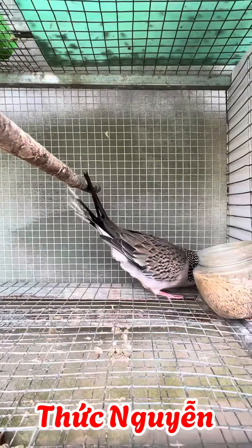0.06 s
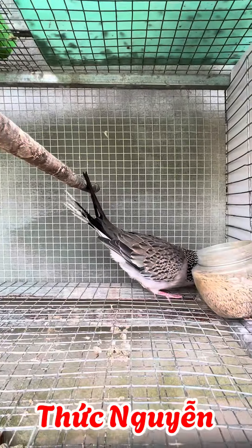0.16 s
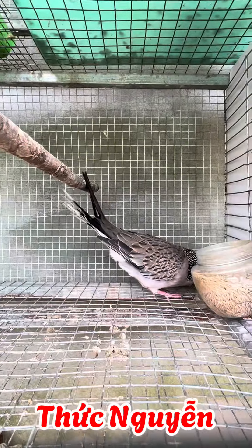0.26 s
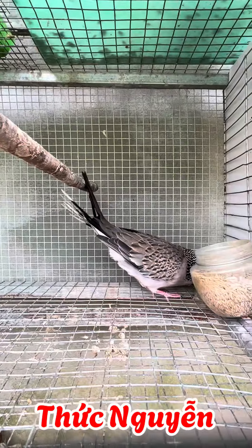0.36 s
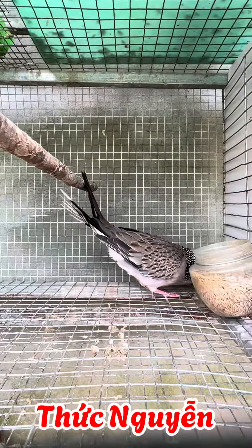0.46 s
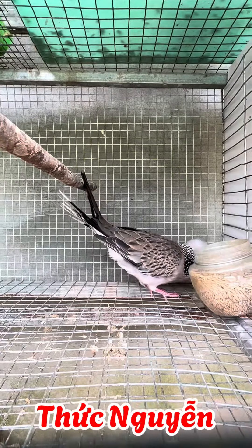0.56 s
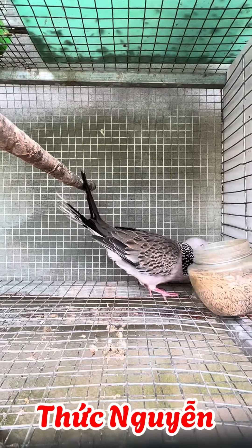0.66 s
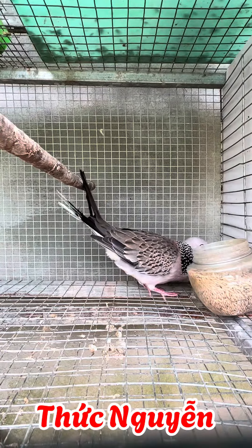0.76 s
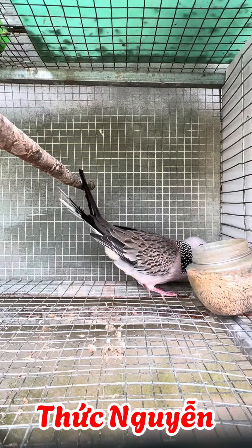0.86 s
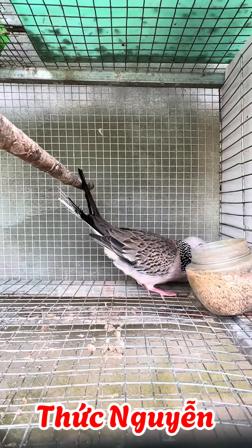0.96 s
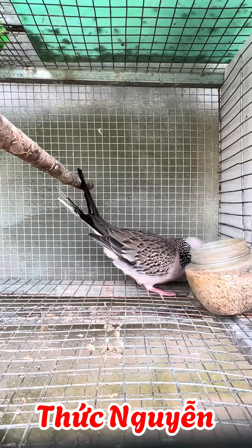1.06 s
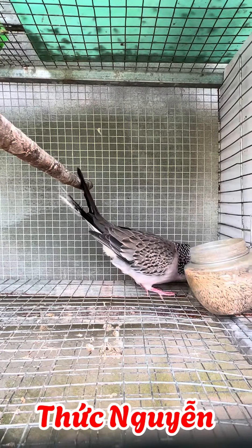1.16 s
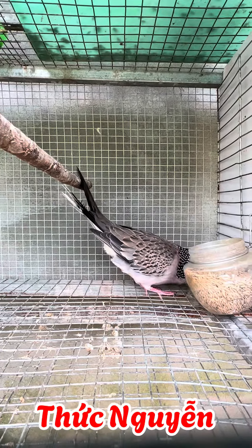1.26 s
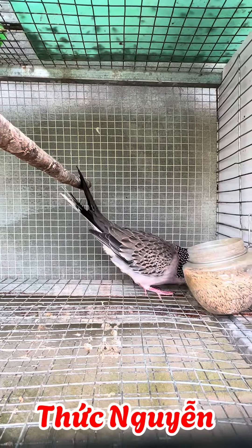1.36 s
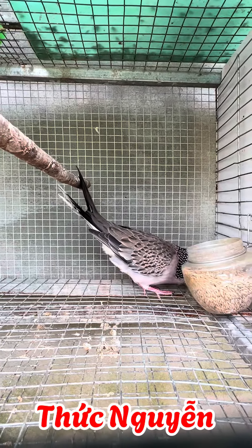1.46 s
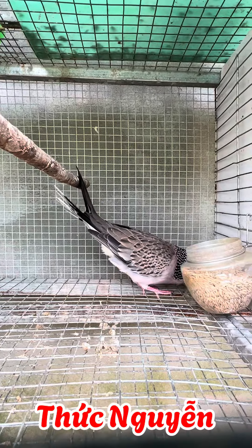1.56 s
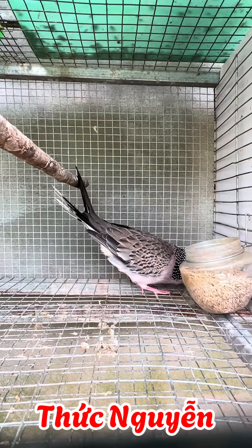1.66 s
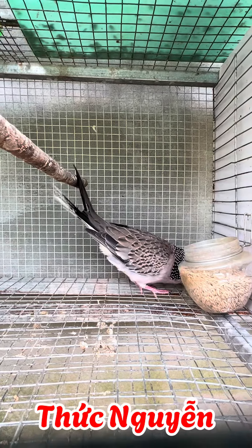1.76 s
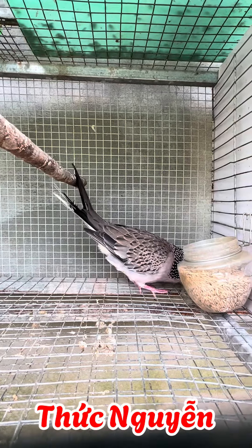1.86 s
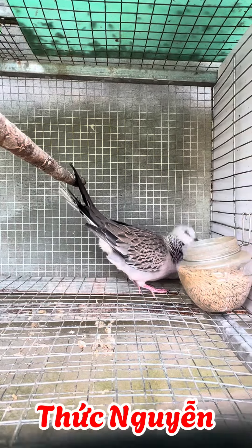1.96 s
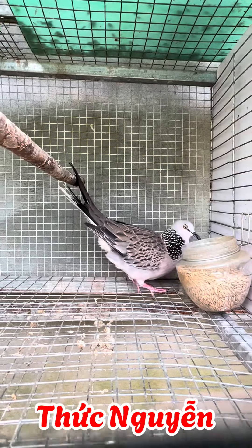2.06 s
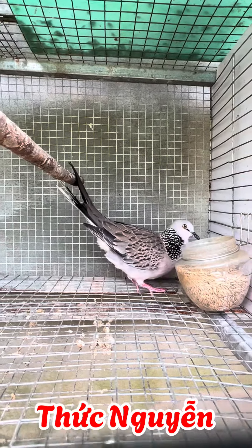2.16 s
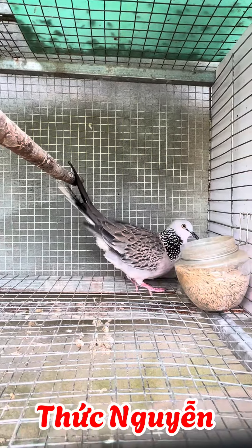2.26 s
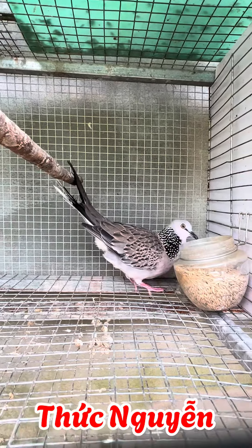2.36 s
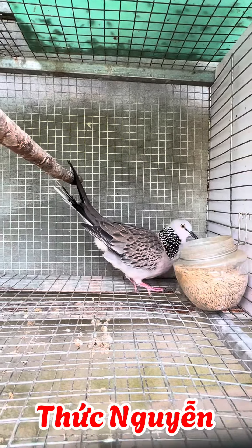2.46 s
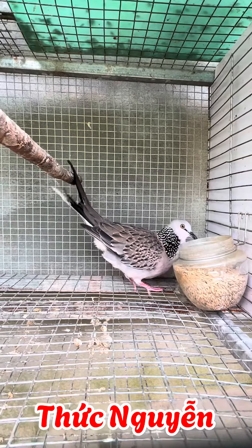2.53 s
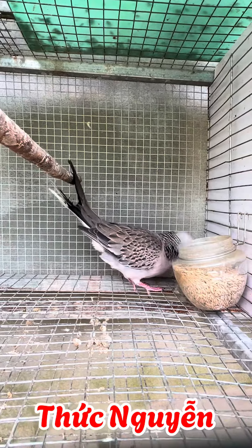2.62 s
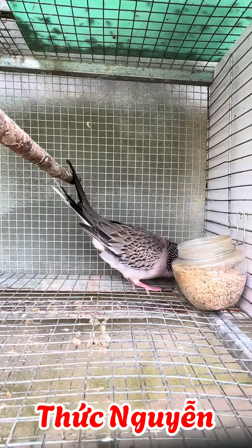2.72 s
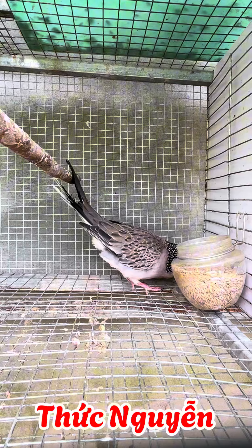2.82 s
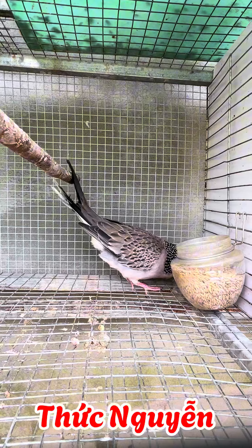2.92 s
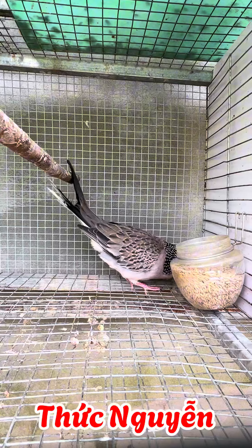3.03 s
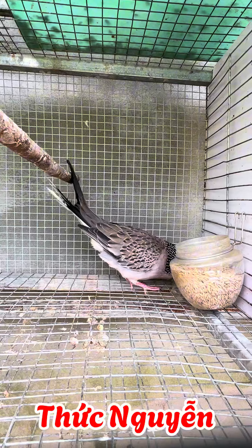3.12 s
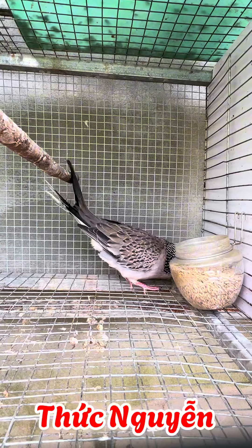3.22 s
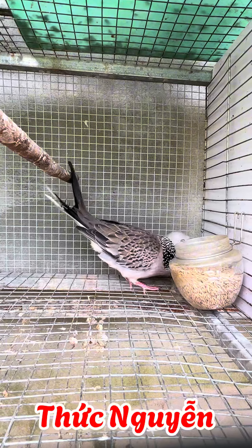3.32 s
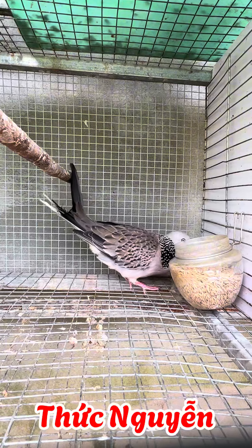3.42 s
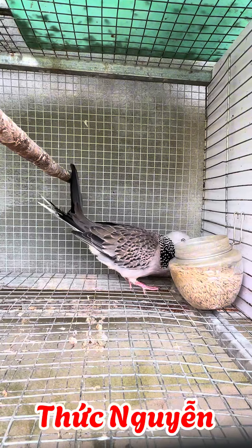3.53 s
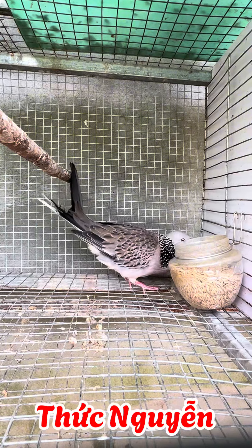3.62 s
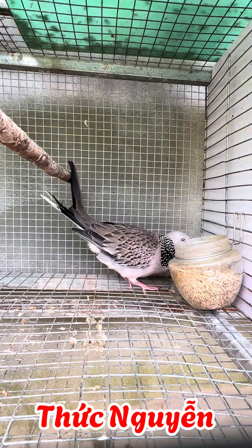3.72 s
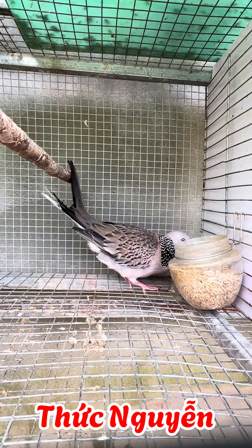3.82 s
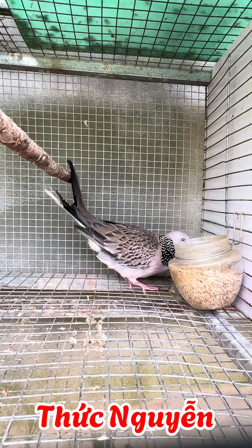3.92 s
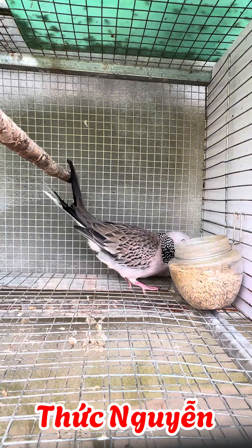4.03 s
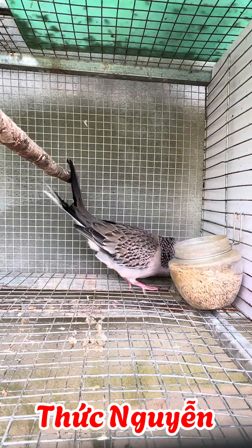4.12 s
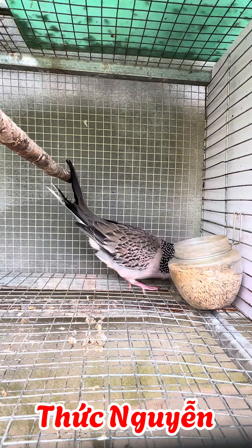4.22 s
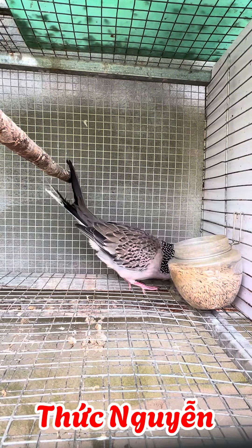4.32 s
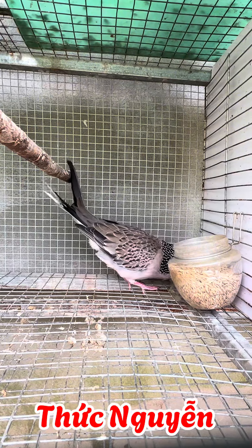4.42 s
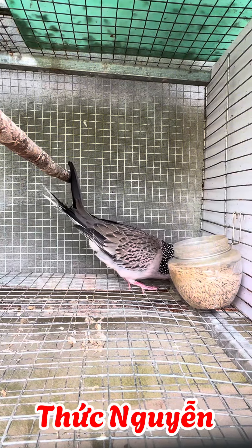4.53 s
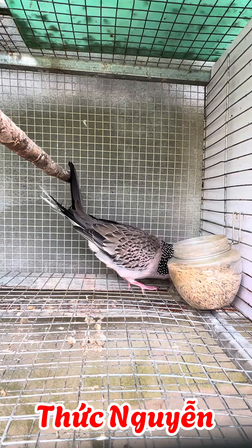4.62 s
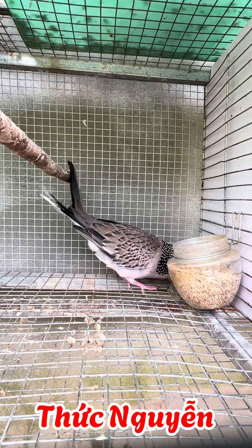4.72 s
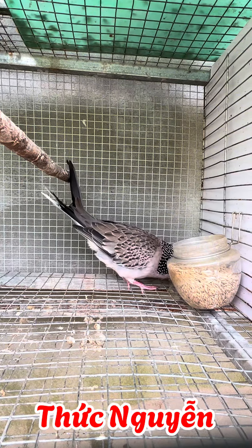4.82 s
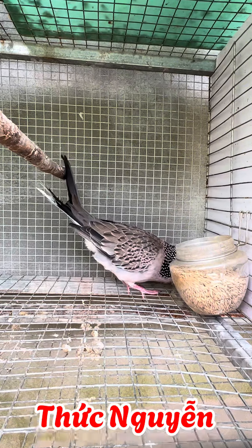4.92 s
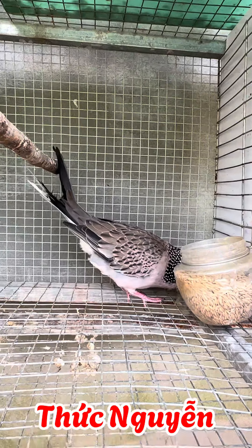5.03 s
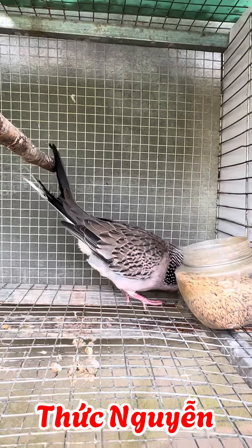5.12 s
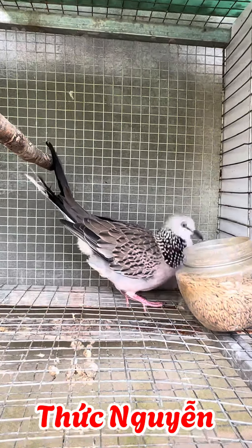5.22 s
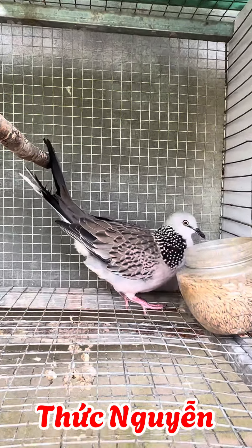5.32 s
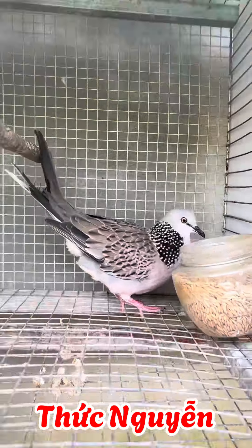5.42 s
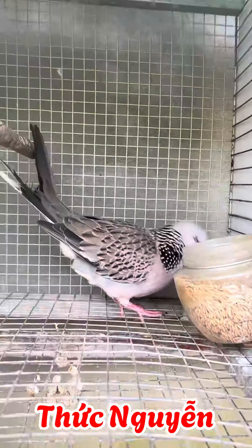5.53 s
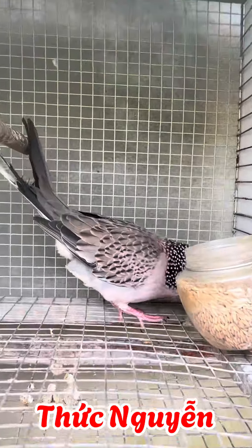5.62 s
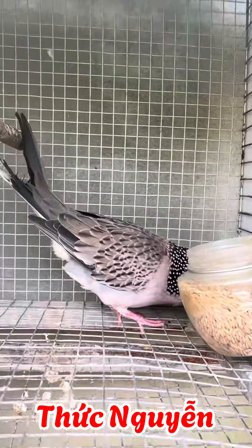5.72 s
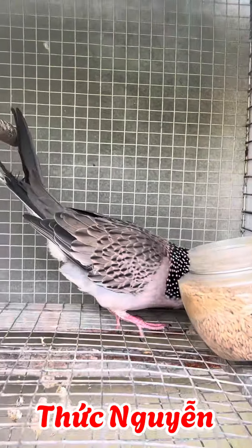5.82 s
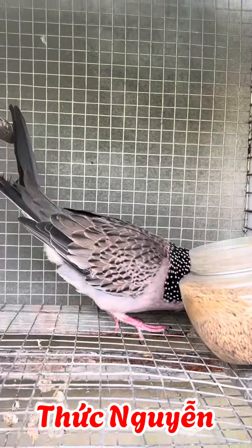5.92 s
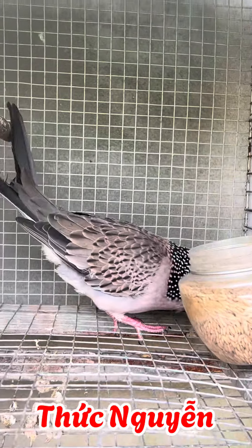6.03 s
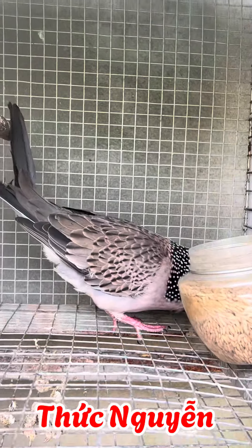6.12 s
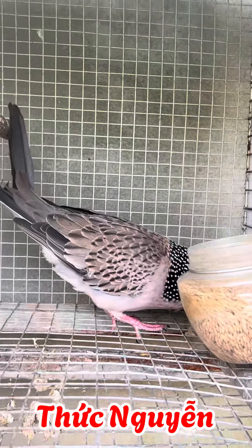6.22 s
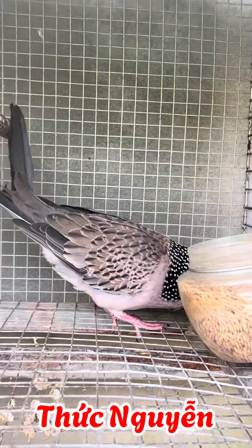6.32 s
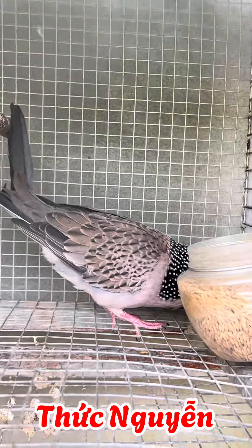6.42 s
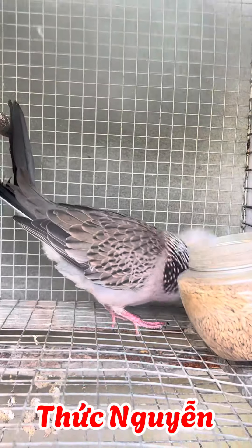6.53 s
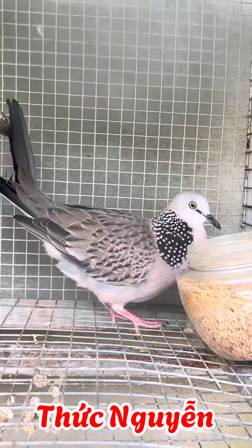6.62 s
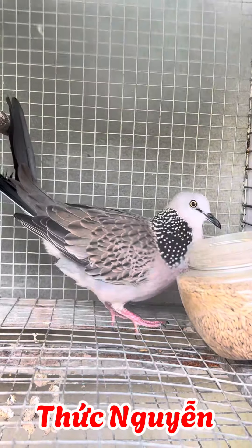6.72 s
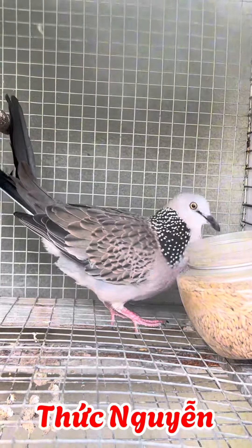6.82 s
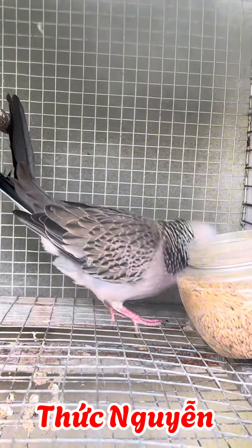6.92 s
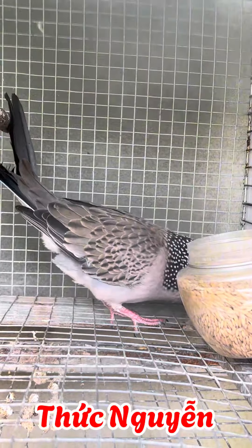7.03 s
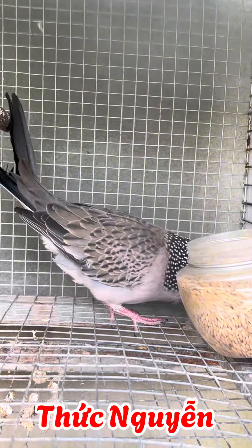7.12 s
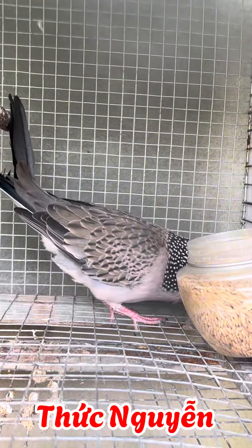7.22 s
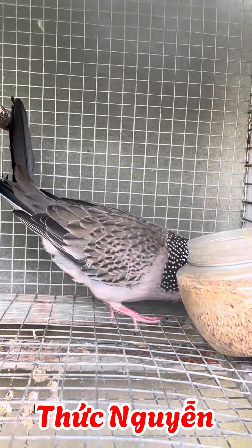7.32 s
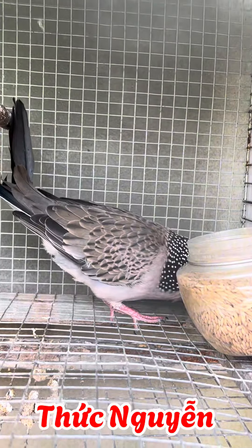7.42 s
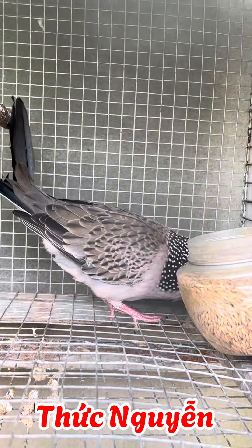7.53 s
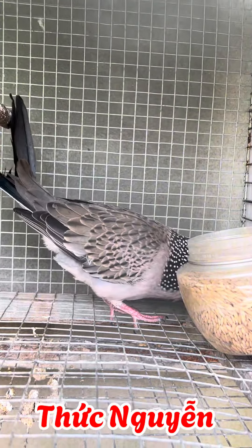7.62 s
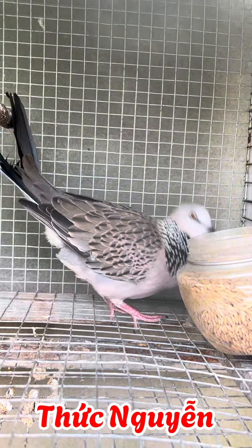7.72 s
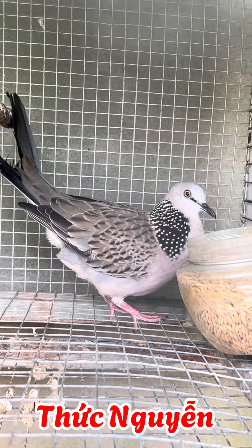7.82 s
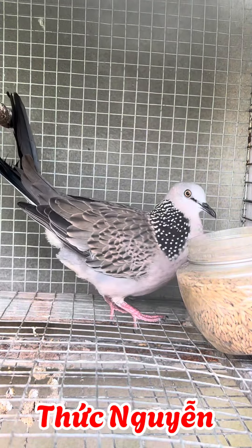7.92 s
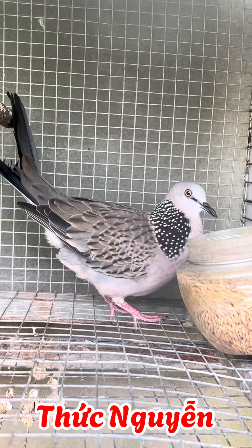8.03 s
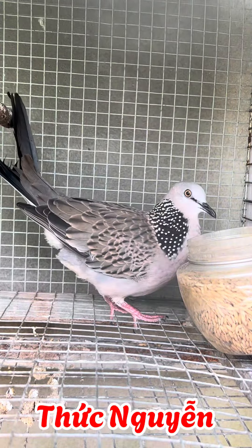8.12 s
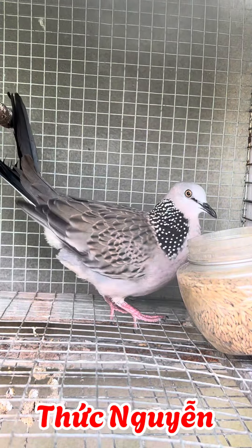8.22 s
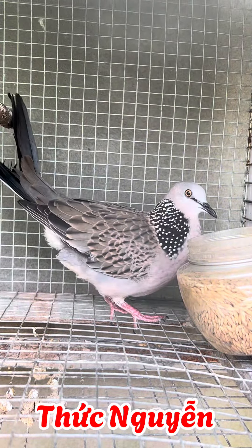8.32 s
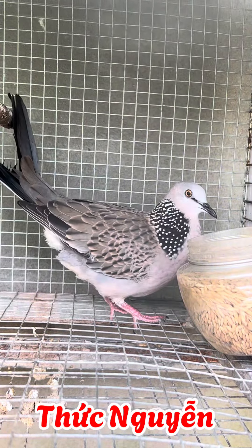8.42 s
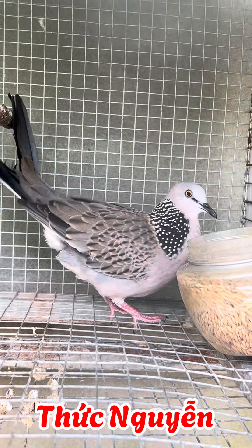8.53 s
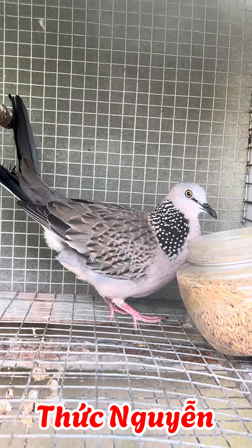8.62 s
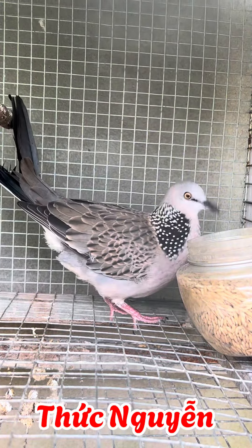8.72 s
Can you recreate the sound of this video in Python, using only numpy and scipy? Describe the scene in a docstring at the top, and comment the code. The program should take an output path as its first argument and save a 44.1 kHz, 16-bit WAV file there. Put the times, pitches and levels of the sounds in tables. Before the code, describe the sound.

A clear, hollow dove coo is already sounding at 0 s, and a long rolling coo follows at 0.2, fading into a faint hum, amid dry rustling and ticks on a wire cage. The close dove gives five more phrases. At 1.1 a short rising note breaks raspily, then a roll at 1.4; a fuller phrase from 2.6 has a short opener, a swelling clear note and a long trill at 3.1. Another short phrase starts at 4.05, a full one at 5.5, and a last at 6.9, rolling until about 7.5. A sharp tick lands near 1.7, scratches cluster around 3.4-3.6, and grazed mesh rings near 6.3. Softer distant doves glide near 2 and from 4.9 to 8.3; tiny high peeps pass between 3.2 and 4.9. Quiet yard air and low rumble continue, with a final tick at 8.4. Near phone microphone, slight enclosed echo.

```python
"""A clear coo is already sounding, over a rustling wire cage and a low yard rumble; a long rolled coo follows.
A spotted dove close to a phone coos six phrases: short notes, each phrase ending on a long rolling one.
Its notes are near-pure tones, chopped into a trill by a fast flutter of the syrinx and filtered by the crop.
Behind it are a fading hum, softer gliding notes of doves further off and faint high sine whistles.
Noise bursts make the cage's ticks and rustles and ring its mesh; coloured noise makes the yard."""
import sys
import numpy as np
from scipy import signal
from scipy.fft import rfft, irfft, next_fast_len
from scipy.io import wavfile
from scipy.ndimage import uniform_filter1d

SR = 44100
rng = np.random.default_rng(int(sys.argv[2]) if len(sys.argv) > 2 else 0)


def output_pcm(signal):
    """Save a mono or channel-first signal as 16-bit PCM at the path in sys.argv[1].

    Samples are clipped to [-1, 1] before scaling.
    """
    pcm = np.clip(np.atleast_2d(signal).T, -1, 1) * 32767
    wavfile.write(sys.argv[1], SR, np.round(pcm).astype(np.int16))


N = 386742
TIME = np.arange(N) / SR


def undb(db):
    """Decibels to gain."""
    return 10 ** (np.asarray(db) / 20)


def unit(x):
    """Scale to rms 1."""
    return x / np.sqrt(np.mean(x ** 2) + 1e-20)


def curves(rows, t):
    """Interpolate the columns of a table at the points t of its first column."""
    s, *columns = np.transpose(rows)
    return [np.interp(t, s, c) for c in columns]


def progress(t, start, length):
    """How far a stretch of time has gone, 0-1."""
    return np.clip((t - start) / max(length, 1e-3), 0, 1)


def band(x, lo_hz, hi_hz, order=2):
    """Band-pass."""
    edges = [lo_hz, min(hi_hz, SR / 2 - 1)]
    return signal.sosfilt(signal.butter(order, edges, "band", fs=SR, output="sos"), x)


def colour(x, points):
    """Shape a sound by a (frequency [Hz], gain [dB]) spectrum, interpolated over log frequency."""
    hz, db = np.transpose(points)
    n = next_fast_len(x.shape[-1])
    bins_hz = np.arange(n // 2 + 1) * SR / n + 1  # the added 1 keeps the logarithm finite
    gain = undb(np.interp(np.log(bins_hz), np.log(hz), db))
    return irfft(rfft(x, n) * gain, n)[..., :x.shape[-1]]


def walk(rate, n=N):
    """Slow chance with a spread near 1, drawing `rate` new values per second."""
    k = max(int(SR / rate), 1)
    steps = np.repeat(rng.standard_normal(n // k + 1), k)
    return uniform_filter1d(steps, k)[:n]


def ripple(x, spread_db):
    """Each contact favours a few pitches of its own: narrow bands wax and wane by chance."""
    frames = signal.stft(x, nperseg=1024)[2]
    chance = uniform_filter1d(rng.standard_normal(frames.shape), size=7, axis=0)  # across frequency
    chance = uniform_filter1d(chance, size=5, axis=1)  # across time
    return signal.istft(frames * undb(spread_db * unit(chance)))[1][:len(x)]


def stereo(mid, side):
    """Mid and side to left and right."""
    return np.array([mid + side, mid - side])


def pan(x, left_db):
    """Place a sound by its left-minus-right level."""
    return x * undb(np.array([[left_db], [-left_db]]) / 2)


def walls(x, t60, width):
    """A short diffuse echo from the walls and roof: decaying noise that differs between the sides."""
    t = TIME[:SR // 2]
    echo = rng.standard_normal((2, len(t))) * undb(-60 * t / t60) * np.clip(t / 0.00059, 0, 1)
    echo = stereo(echo[0], width * echo[1]) / np.sqrt(np.sum(echo[0] ** 2))
    return signal.fftconvolve(x[None], echo, axes=1)[:, :N]


# spectrum of the yard air: (frequency [Hz], gain [dB])
YARD_COLOUR = [(15, -40.5), (25, -14), (50, -2.5), (123, -9), (204, -22), (277, -12.5), (426, -28.5),
               (471, -26.5), (562, -23), (762, -30.5), (1090, -38.5), (1550, -40), (2150, -40.5),
               (8220, -49.5), (10600, -58.5), (13800, -88), (22000, -120)]
# swells of the distant rumble, before its trim: (time [s], half width to 1/e power [s], level [dB])
RUMBLE_SWELLS = [(2.948, 0.23, -45.5), (4.607, 0.33, -47.5), (5.487, 0.26, -42.5), (6.394, 0.32, -41),
                 (7.164, .3, -42.5), (7.947, 0.063, -36.5)]
RUMBLE_FLOOR_DB, RUMBLE_TRIM_DB = -52, -4  # the trim lowers floor and swells together
AIR_DB = -48


def yard(width=0.15):
    """Steady outdoor air that swells a little, and a distant rumble that is alike in both ears."""
    mid, side = colour(rng.standard_normal((2, N)), YARD_COLOUR)
    air = unit(stereo(mid, width * band(side, 260, 15000, order=1)))
    air = air * undb(AIR_DB + 1.2 * walk(5))
    rumble = unit(band(rng.standard_normal(N), 46, 135, order=3))
    swells = sum(undb(db) ** 2 * np.exp(-((TIME - s) / half) ** 2) for s, half, db in RUMBLE_SWELLS)
    rumble_gain = np.sqrt(undb(RUMBLE_FLOOR_DB) ** 2 + swells) * undb(RUMBLE_TRIM_DB)
    return air + rumble * rumble_gain


# faint brief high whistles, one over the dove's coo at 3.194 s, others like bird peeps:
# (time [s], length [s], start pitch [Hz], end pitch [Hz], peak level [dB])
HIGH_WHISTLES = [(3.194, 0.094, 6350, 6100, -60.5), (3.561, 0.046, 3220, 3000, -52),
                 (3.775, .04, 2900, 2880, -63), (3.935, 0.034, 3200, 3230, -66.5),
                 (4.816, 0.081, 3690, 3840, -68)]


def high_whistles():
    """Faint brief high whistles: sines that glide in pitch under a smooth swell."""
    out = np.zeros(N)
    for s, length, start_hz, end_hz, db in HIGH_WHISTLES:
        i, n = int(s * SR), int(length * SR)
        phase = 2 * np.pi * np.cumsum(np.linspace(start_hz, end_hz, n)) / SR
        out[i:i + n] += undb(db) * np.hanning(n) * np.sin(phase)
    return out


def note_span(start, length):
    """Sample indices of a note, the time since it began, and a gate that opens fast and closes gently."""
    attack, release = 300, 900  # samples
    i = np.arange(max(int(start * SR), 0), min(int((start + length) * SR) + release // 2, N))
    t = TIME[i] - start
    opening = t * SR / attack
    closing = ((i[-1] - i) / release) ** 2
    return i, t, np.clip(np.minimum(opening, closing), 0, 1)


def flutter(rate, depth, jitter, scatter_db, slip, reach, sweep_hz, fray):
    """Complex trill envelope: overlapping pulses start out of step, so some merge, some cancel; edges fray."""
    n = len(rate)
    cycles = np.cumsum(rate * np.exp(jitter * walk(50, n))) / SR
    k, p = cycles.astype(int), cycles % 1
    size, start = rng.standard_normal((k[-1] + 2, 2)).T
    depth = np.clip(depth, 0, 1)
    pulses = 0
    for j, away in ((k, p), (k + 1, 1 - p)):  # the pulse behind and the pulse ahead
        shape = np.cos(np.pi / 2 * np.minimum(away / reach, 1)) ** 2 * undb(scatter_db * size[j])
        out_of_step = depth * (np.pi * (j % 2) + slip * start[j])
        sweep = np.pi * sweep_hz / rate * away ** 2
        pulses = pulses + shape * np.exp(1j * (out_of_step + sweep))
    frayed = 1 + fray * depth * (walk(260, n) + 1j * walk(260, n))
    envelope = (1 - depth + depth * pulses) * frayed
    return envelope / np.sqrt(np.mean(np.abs(envelope) ** 2))


# soft tones behind the near dove, a fading hum near 560 Hz, then notes of doves further off:
# (time [s], glide to top [s], glide to end [s], start pitch [Hz], top pitch [Hz], end pitch [Hz],
# power of the end glide, level before the carry [dB], flutter [per s], flutter depth [0-1], swell-in [s])
SOFT_TONES = [(.66, 0.043, 0.28, 561, 572.5, 547, 1.2, -49.5, 31.4, 0.51, 0.0092),
              (1.855, 0.036, 0.15, 533, 568, 580, 0.91, -52, 41, 0.66, 0.0075),
              (1.87, 0.042, 0.15, 673, 696, 689, 1.6, -39, 44.6, 0.71, 0.022),
              (2.02, 0.02, 0.12, 674, 651, 626, 1.16, -47, 66, 1, .025),
              (2.155, 0.033, 0.057, 631, 667, 667, 4.1, -37.5, 53, 0, 0.049),
              (2.25, 0.037, 0.021, 567, 645, 605, 1, -50.5, 54, 0.78, 0.0086),
              (4.945, 0.078, 0.14, 510, 768, 588, 0.15, -39, 32, 0.02, 0.036),
              (5.46, 0.63, 0.073, 565.4, 763, 745, 0.78, -34.5, 24, 0.69, 0.96),
              (6.49, 0.085, .31, 736, 766, 673, 1.2, -38.5, 29, 0.58, 0.017),
              (7.03, 0.016, 0.084, 714, 708, 668, 1.34, -39.5, 29, 0.22, 0.011),
              (7.46, 0.025, 0.051, 660, 667, 647, 1.1, -40.5, 36, 0.3, 0.075),
              (7.555, 0.3, 0.021, 593, 646.4, 646, 1.1, -41, 24.8, 1, 0.014),
              (7.85, 0.064, 0.4, 692, 705, 540, 7.5, -38.5, 32, 0.36, 0.011)]
# the soft tones carry best at some pitches: (pitch [Hz], gain [dB])
FAR_CARRY = [(500, 17), (560, 0), (620, 4.5), (670, -2), (715, -14.5), (770, -12.5)]
FAR_FADE_S = 0.0084


def soft_tones(octave_db=-44, waver=.008):
    """Soft fluttering tones: each pitch glides from start to top, quickly or slowly, then on to its end."""
    out = np.zeros(N)
    for (start, to_top, to_end, start_hz, top_hz, end_hz, power,
         level_db, rate, depth, swell_s) in SOFT_TONES:
        i, t, gate = note_span(start, to_top + to_end)
        first_glide = (top_hz - start_hz) * (1 - progress(t, 0, to_top)) ** 1.6
        second_glide = (top_hz - end_hz) * progress(t, to_top, to_end) ** power
        hz = top_hz - first_glide - second_glide
        db = level_db + curves(FAR_CARRY, hz)[0]
        gate = gate * np.sqrt(progress(t, 0, swell_s) * progress(t[-1] - t, 0, FAR_FADE_S))
        envelope = flutter(np.full(len(t), rate), depth, jitter=.2, scatter_db=2.5, slip=1.4,
                           reach=.5, sweep_hz=70, fray=.12)
        turn = np.exp(2j * np.pi * np.cumsum(hz * (1 + waver * walk(30, len(t)))) / SR)
        tone = (envelope * (turn + undb(octave_db) * turn ** 2)).imag * np.sqrt(2)
        out[i] += gate * undb(db) * tone
    return out


# bouts of rustling about the cage, before the trims: (time [s], length [s], treble level [dB], body level [dB])
RUSTLES = [(0, 0.32, -56.5, -55.5), (0.255, 0.12, -55.5, -49.5), (0.472, 1.8, -62, -60),
           (1.785, 0.4, -59.5, -54.5), (2.526, 0.6, -59.5, -54), (3.12, 0.27, -72, -70.5),
           (3.325, 0.39, -60, -57.5), (4.428, 0.031, -54, -51.5), (4.548, 0.21, -69.5, -84),
           (5.622, 0.51, -64, -62), (6.176, 0.18, -54.5, -49), (6.389, 0.53, -63.5, -63.5),
           (6.981, 0.53, -66, -64.5), (7.929, 0.12, -67.5, -65), (8.386, 0.56, -67.5, -68.5)]
RUSTLE_ATTACK_S, RUSTLE_RELEASE_S = 0.022, 0.15
STILL_TREBLE_DB, STILL_BODY_DB = -74.5, -68  # what is left between bouts


def bouts():
    """Treble and body levels of the rustle in dB: each bout sets in, holds and dies away."""
    power = undb([[STILL_TREBLE_DB], [STILL_BODY_DB]]) ** 2
    for start, length, treble_db, body_db in RUSTLES:
        dying = np.exp(-np.maximum(TIME - start - length, 0) / RUSTLE_RELEASE_S)
        shape = progress(TIME, start, RUSTLE_ATTACK_S) * dying
        power = power + (undb([[treble_db], [body_db]]) * shape) ** 2
    return 10 * np.log10(power)


# spectrum of the rustle: (frequency [Hz], gain [dB])
RUSTLE_COLOUR = [(530, -35), (900, 9), (928, 8), (1080, 0.5), (1240, -9), (1850, -7), (2100, -9.5),
                 (2420, -6), (2600, -10.5), (2920, -8), (3550, -7.5), (3930, -10), (5470, -3.5), (8270, -6),
                 (10600, -19), (13800, -43.5), (22000, -120)]


def rustle(body_trim_db=-1.0, ripple_db=3.5):
    """A fine dry crackle: noise in little clusters, each starting sharply and dying away."""
    treble_db, body_db = bouts()
    touches = (rng.random(N) < 45 / SR) * undb(3 * rng.standard_normal(N))  # about 45 per s
    decay_s = .02
    clusters = .7 + signal.lfilter([1], [1, -np.exp(-1 / (decay_s * SR))], touches)
    grain_db = 5.5 * walk(1100)
    hiss = ripple(colour(rng.standard_normal(N), RUSTLE_COLOUR), ripple_db) * clusters * undb(grain_db)
    treble = unit(band(hiss, 5200, 19000)) * undb(treble_db)
    body = unit(band(hiss, 1200, 4400)) * undb(body_db + body_trim_db)
    return treble + body


def seeds(gain_db=5, t60=0.007, rate_per_s=18, scatter_db=3):
    """Single grains click against the mesh: short noise bands whose level follows the bouts of rustling."""
    out, t = np.zeros(N), TIME[:SR // 50]
    bout_db = bouts()[0]
    for i in np.flatnonzero(rng.random(N - len(t)) < rate_per_s / SR):
        hz = np.exp(rng.uniform(np.log(1800), np.log(7000)))
        click = unit(band(rng.standard_normal(len(t)), hz / 1.4, hz * 1.2)) * undb(-60 * t / t60)
        out[i:i + len(t)] += click * undb(bout_db[i] + gain_db + scatter_db * rng.standard_normal())
    return out


# ticks and scratches on the cage: (time [s], starting level before the trim [dB],
# body against treble [dB], level of the 14-15.5 kHz noise band against treble [dB], t60 [s])
TICKS = [(0.12, -39.5, -22, -12, 0.39), (0.272, -49, -10, -23, 0.13), (.335, -46, 5, -11, 0.19),
         (0.364, -41, 4, -31.5, 0.039), (0.912, -51.5, -2, -21, 0.32), (1.309, -46, 0, -21, 0.39),
         (1.489, -50, -10, -25, 0.26), (1.61, -44.5, 0, -18, 0.26), (1.679, -26, -4.5, -24, 0.019),
         (1.77, -46.5, -4, -14, 1), (1.831, -39, 0, -28, 0.034), (1.897, -45, -34, -13, 0.62),
         (2.011, -43.5, -3.5, -24, 1), (2.131, -52, 13, -28, 0.044), (2.2312, -41.5, -7, -30, 0.17),
         (2.366, -46.5, -11, -21, 0.38), (2.501, -56, -8, -28, 0.12), (2.659, -43, 4.5, -23, 0.22),
         (2.572, -57, -2, -16, .08), (2.756, -53, -14, -22, 0.29), (2.886, -48, -17, -17, 0.15),
         (2.9297, -38.5, 3, -11, 0.08), (3.08, -45.5, 1, -15.5, 0.25), (3.262, -49.5, -1, -21.5, .1),
         (3.296, -47.5, -10, -13, 1), (3.401, -37.5, -10, -14, 0.2), (3.4668, -37.5, -21, -14, 0.23),
         (3.602, -35, -7, -20, 0.3), (3.728, -49, -11, -15, 0.11), (4.159, -49, 6, -24, 0.16),
         (4.195, -44, 2, -20, .13), (4.371, -41.5, -35, -22, 0.086), (4.484, -42.5, 2, -11, 0.15),
         (4.651, -51.5, -19, -28, 0.22), (5.185, -57.5, -12, -25, 0.15), (5.475, -50.5, 1, -27, 0.18),
         (6.01, -50, -5, -21.5, 0.43), (6.206, -33, -3.5, -22, 0.33), (6.324, -45, -32, -37, 0.3),
         (6.538, -48, -15, -25, .12), (6.663, -39.5, -9, -34, 0.2), (6.804, -38.5, -11, -11, 0.16),
         (8.3635, -35.5, -1, -35, 0.067)]
# spectrum of a tick: (frequency [Hz], gain [dB])
TICK_COLOUR = [(880, -51.5), (1500, -3.5), (1650, -3), (1830, -11.5), (3060, -2.5), (3290, -5.5), (3840, 0),
               (4130, -4.5), (5600, -14.5), (6120, -12.5), (8090, -16), (9520, -18.5), (10600, -28),
               (13800, -47), (22000, -120)]


def ticks(trim_db=-6.5, grain_db=4, attack_s=0.00079, crack=0.41, crack_s=0.00062, ripple_db=3.5):
    """Each scratch is a sharp first contact and a burst of tiny bright ones that thins out quickly."""
    out, t = np.zeros(N), TIME[:SR // 3]
    for s, db, body_db, top_band_db, t60 in TICKS:
        grains = rng.standard_normal(len(t)) * undb(grain_db * walk(600, len(t)))
        tint = ripple(colour(grains, TICK_COLOUR), ripple_db)
        burst = unit(band(tint, 7300, 11000))
        burst += undb(body_db) * unit(band(tint, 1100, 4100))
        burst += undb(top_band_db) * unit(band(grains, 14000, 15500))
        decay_db = -60 * t / max(t60, .01)
        burst = unit(burst) * undb(db + trim_db + decay_db) * np.minimum(t / attack_s, 1)
        burst *= 1 + crack * np.exp(-t / crack_s)
        i = int(s * SR)
        out[i:i + len(t)] += burst[:N - i]
    return out


# resonances of the wire mesh: (pitch [Hz], half width [Hz], gain [dB])
WIRE_MODES = [(4960, 34, 12), (5280, 89, 5.5)]
# the mesh is grazed and sings: (time [s], level [dB], t60 [s])
GRAZES = [(6.32, -48, 0.37), (6.364, -51, 0.15), (6.58, -61, .2)]


def wire():
    """Grazed wires ring briefly at a few close pitches: narrow noise bands under decaying envelopes."""
    ring = sum(undb(db) * band(rng.standard_normal(N), hz - half, hz + half, order=1)
               for hz, half, db in WIRE_MODES)
    touch = sum(undb(db - 60 * np.maximum(TIME - s, 0) / t60) * np.clip((TIME - s) / 0.00099, 0, 1)
                for s, db, t60 in GRAZES)
    return unit(ring) * touch


def mesh(x, width=0.77, t60=.028):
    """Small contacts set many short-lived wire resonances ringing, a little differently on each side."""
    t = TIME[:SR // 20]
    ring = rfft(rng.standard_normal((2, len(t))) * undb(-60 * t / t60))
    # the resonances are dense and spread evenly over the spectrum
    ring = irfft(ring / np.sqrt(uniform_filter1d(np.abs(ring) ** 2, size=16)))[:, :len(t) // 2]
    ring = stereo(ring[0], width * ring[1]) / np.sqrt(np.sum(ring[0] ** 2))
    return signal.fftconvolve(x[None], ring, axes=1)[:, :N]


BREAK_S, BREAK_DROP_HZ = .016, 54.3  # the voice gives way quickly in openers and rolls
RASP_RATE_PER_S, OPEN_RAGGED = 78, .65


def second_voice(start, rise, split, hz, db, sag_hz=35, fade_db=7, depth=.4):
    """After the split the other side of the syrinx sounds a pitch of its own, which sags and fades."""
    i, t, gate = note_span(start + rise + BREAK_S, split - BREAK_S)
    gone = progress(t, 0, split)
    rate = np.full(len(t), RASP_RATE_PER_S)
    return i, gate, db - fade_db * gone, hz - sag_hz * gone, rate, np.full(len(t), depth), OPEN_RAGGED


OPEN_FROM_HZ, OPEN_KNEE_HZ, OPEN_FROM_DB = 250, 561.8, -41
OPEN_DEPTH, RASP_FADE_DB = 0.24, 5.5


def opener(start, rise, split, top_hz, end_hz, db, split_db, rasp, second_hz, second_db):
    """Pitch and level climb together; then the voice splits into a falling rasp and a steadier branch."""
    i, t, gate = note_span(start, rise + split)
    stages = [0, rise / 2, rise, rise + BREAK_S, rise + split / 2, rise + split]
    broken_hz = top_hz - BREAK_DROP_HZ
    falling_hz = broken_hz + 0.67 * (end_hz - broken_hz)
    hz = np.interp(t, stages, [OPEN_FROM_HZ, OPEN_KNEE_HZ, top_hz, broken_hz, falling_hz, end_hz])
    level = np.interp(t, stages, [OPEN_FROM_DB, (db + split_db) / 2, db,
                                  split_db, split_db, split_db - RASP_FADE_DB])
    depth = np.interp(t, stages[:4], [1, OPEN_DEPTH, OPEN_DEPTH, rasp])
    first = (i, gate, level, hz, np.full(len(t), RASP_RATE_PER_S), depth, OPEN_RAGGED)
    return [first, second_voice(start, rise, split, second_hz, second_db)]


SWELL_FROM_HZ, SWELL_KNEE_HZ, SWELL_SAG_HZ, SWELL_END_HZ = 460, 536, 56.4, 565.5
SWELL_FROM_DB, SWELL_KNEE_DB, SWELL_END_DB = -42.5, -27, -35.5
SWELL_CLEARS_S, SWELL_RELEASE_S = 0.022, 0.029
SWELL_KNEE_DEPTH, CLEAR_DEPTH, SWELL_RAGGED = .65, 0.12, .5
TAIL_DEPTH = .55  # flutter depth at the end of swells and rolls


def swell(start, rasp, clear, top_hz, db, fade_db):
    """A low rasp jumps up to a pure held tone, which sags and is let go."""
    held = rasp + clear
    i, t, gate = note_span(start, held + SWELL_RELEASE_S)
    stages = [0, rasp - SWELL_CLEARS_S, rasp, held, held + SWELL_RELEASE_S]
    hz = np.interp(t, stages, [SWELL_FROM_HZ, SWELL_KNEE_HZ, top_hz, top_hz, SWELL_END_HZ + SWELL_SAG_HZ])
    hz -= SWELL_SAG_HZ * progress(t, rasp, clear) ** 4
    level = np.interp(t, stages, [SWELL_FROM_DB, SWELL_KNEE_DB, db, db - fade_db, SWELL_END_DB])
    depth = np.interp(t, stages, [1, SWELL_KNEE_DEPTH, CLEAR_DEPTH, CLEAR_DEPTH, TAIL_DEPTH])
    return i, gate, level, hz, np.full(len(t), RASP_RATE_PER_S), depth, SWELL_RAGGED


# a faint rasp before the voice takes hold
ROLL_FROM_HZ, ROLL_CATCH_HZ, ROLL_FROM_DB, ROLL_CATCH_DB = 490, 629.2, -38, -22.5
CATCH_BEATS, ROLL_LEAP_S = 2.5, .005
SMOOTH_RATE_PER_S, SMOOTH_DEPTH = 48, .33
TAIL_RATE_PER_S, TAIL_RAGGED, TAIL_FADE_DB = 105, .6, 9.5
SAG_POWER = 1.7  # the pitch sags slowly at first, then faster


def roll(start, catch, rolled, smooth, tail, top_hz, break_hz, end_hz, db, break_db, tail_db,
         first_rate, last_rate, ragged):
    """The coo catches, leaps up and sags as its flutter quickens, then eases; it breaks and slides away."""
    held, leap = rolled + smooth, catch + ROLL_LEAP_S
    i, t, gate = note_span(start, held + tail)
    stages = [0, catch, leap, held, held + BREAK_S, held + tail]
    sag = (top_hz - break_hz) * progress(t, leap, held - leap) ** SAG_POWER
    held_hz = np.interp(t, stages[:3], [ROLL_FROM_HZ, ROLL_CATCH_HZ, top_hz]) - sag
    tail_hz = np.interp(t, stages[3:], [break_hz, break_hz - BREAK_DROP_HZ, end_hz])
    hz = np.where(t < held, held_hz, tail_hz)
    level = np.interp(t, stages, [ROLL_FROM_DB, ROLL_CATCH_DB, db, break_db, tail_db, tail_db])
    level = level - TAIL_FADE_DB * progress(t, held, tail) ** 3
    depth = 1 + (SMOOTH_DEPTH - 1) * progress(t, rolled, ROLL_LEAP_S)
    depth = depth + (TAIL_DEPTH - SMOOTH_DEPTH) * progress(t, held, BREAK_S)
    quickening = np.interp(t, [catch, rolled], [first_rate, last_rate])
    rates = np.select([t < catch, t < rolled, t < held],
                      [CATCH_BEATS / catch, quickening, SMOOTH_RATE_PER_S], TAIL_RATE_PER_S)
    return i, gate, level, hz, rates, depth, np.where(t < rolled, ragged, TAIL_RAGGED)


# short upward notes that split into two voices: (time [s], rise [s], split [s], top pitch [Hz],
# end pitch [Hz], level [dB], level after the split [dB], rasp depth [0-1], second voice [Hz],
# second voice level [dB])
OPENERS = [(1.068, .067, 0.13, 572.8, 459, -26, -39, 1, 561, -32.5),
           (2.579, 0.049, .09, 566, 336.5, -27, -41.5, 0.5, 550, -36.5),
           (4.051, .068, 0.12, 600, 518, -23, -33.5, 1, 665.6, -39),
           (5.52, 0.049, .065, 557, 395, -25.5, -39.5, 0.5, 588, -33),
           (6.857, 0.068, 0.105, 682.7, 586, -17.5, -27, 0.9, 597, -36.5)]
# a rasp that swells into a clear note: (time [s], rasp [s], clear [s], top pitch [Hz], level [dB], fade [dB])
SWELLS = [(-.11, .1, 0.085, 666, -17.5, 11), (2.771, 0.108, 0.078, 676.6, -18, 1),
          (5.711, 0.085, 0.092, 667, -16, 4)]
# the long coo that ends each phrase: (time [s], catch [s], end of the roll after the start [s], smooth [s],
# tail [s], top pitch [Hz], pitch at the break [Hz], end pitch [Hz], level [dB], level at the break [dB],
# tail level before its fade [dB], first flutter [per s], last flutter [per s], raggedness [0-1])
ROLLS = [(.21, 0.034, 0.22, 0.038, 0.2, 687.8, 638.6, 450.4, -18, -22.5, -30.5, 48.8, 51, 0.2),
         (1.371, 0.032, 0.22, .014, 0.12, 677.5, 645.5, 515.4, -18.5, -20, -24.5, 59.2, 63, .5),
         (3.108, 0.028, 0.23, 0.068, .13, 685, 624, 467, -18, -16.5, -30.5, 47.5, 72, .25),
         (4.339, 0.042, .165, .061, 0.13, 671, 637, 519, -17.5, -20, -24.5, 50, 105, .55),
         (6.025, .031, .238, .071, .135, 684.7, 614, 436, -15.5, -19, -32.5, 50, 62, .15),
         (7.122, .03, 0.15, .1, 0.099, 682.6, 624, 523.6, -17, -17, -26.5, 60, 74, .55)]


def notes():
    """Every near-dove note as (samples, gate, dB, Hz, flutter per s, flutter depth, raggedness)."""
    openers = [voice for row in OPENERS for voice in opener(*row)]
    return openers + [swell(*row) for row in SWELLS] + [roll(*row) for row in ROLLS]


# passband of the crop and neck: (frequency [Hz], gain [dB])
CROP = [(150, -15), (350, 0), (480, -0.3), (660, 0), (780, 1.8), (950, -3.5), (1400, -19), (3000, -31.5)]
# rasp of the throat: (frequency [Hz], gain [dB])
RASP = [(200, -14.5), (350, 0), (920, -4), (1030, -9.5), (1150, -3), (1330, -22.5), (1500, -27),
        (2050, -20.5), (2500, -30), (6000, -72.5)]
# the octave is strong where it falls into the crop's resonance:
# (pitch of the octave [Hz], level against the fundamental [dB])
OCTAVE = [(700, -1), (800, -10), (950, -25), (1120, -33), (1200, -41), (1320, -44)]
TWELFTH_DB = -50
RAGGED_JITTER, RAGGED_SCATTER_DB = .28, 4.2  # at full raggedness
OVERTONE_BLUR = .4


def dove(rasp_db=-47, creak_db=-13, whistle_db=-53, whistle_hz=6500, waver=0.012):
    """The swollen crop passes the fundamental and leaves only faint overtones and rasp."""
    voice, extra = np.zeros(N), np.zeros(N)
    rasp = unit(colour(rng.standard_normal(N), RASP))
    creak = unit(band(rng.standard_normal(N), 621, 764))
    whistle = unit(band(rng.standard_normal(N), 20, 160))
    for i, gate, db, hz, rate, depth, ragged in notes():
        envelope = flutter(rate, depth, RAGGED_JITTER * ragged, RAGGED_SCATTER_DB * ragged,
                           slip=1.6, reach=.59, sweep_hz=115, fray=.13)
        phase = 2 * np.pi * np.cumsum(hz * (1 + waver * walk(120, len(i)))) / SR
        tone = np.sqrt(2) * envelope * np.exp(1j * phase)
        # slack, low-pitched membranes slap unevenly and ring the crop
        slack = np.clip((660 - hz) / 150, 0, 1)
        slaps = undb(creak_db) * (slack + .4) * depth * creak[i] * np.abs(envelope)
        voice[i] += gate * undb(db) * (tone.imag + slaps)
        # the rasp misses the crop's resonance, so it swells less than the fundamental
        effort = undb((db + 18) / 2)
        rough = undb(rasp_db) * rasp[i] * depth * np.abs(envelope)
        octave_db = curves(OCTAVE, 2 * hz)[0]
        turn = np.exp(1j * np.angle(tone))
        blur = 1 + OVERTONE_BLUR * (walk(110, len(i)) + 1j * walk(110, len(i)))
        overtones = (tone * blur * (undb(octave_db) * turn + undb(TWELFTH_DB) * turn ** 2)).imag
        # a thin whistle follows the level and pitch of the note, at whistle_hz when the note is at 670 Hz
        thin = undb(whistle_db + db) * whistle[i] * np.sin(phase * whistle_hz / 670)
        extra[i] += gate * (undb(db) * overtones + effort * rough + thin)
    return colour(voice, CROP) + extra


# hollow resonances of the cage: (pitch [Hz], t60 [s], gain [dB])
CAGE_MODES = [(532, .19, -5), (715, .12, -17)]


def cage_ring(x):
    """The hollow of the cage hums on after each note: decaying resonators driven by the voice."""
    out = 0
    for hz, t60, db in CAGE_MODES:
        pole = np.exp((2j * np.pi * hz - np.log(1000) / t60) / SR)
        out = out + 2 * undb(db) * (1 - abs(pole)) * signal.lfilter([1], [1, -pole], x).imag
    return out


# a standing wave in the cage leans each pitch to one side: (pitch [Hz], left minus right [dB])
STANDING_WAVE = [(400, 2), (500, 0), (565, -6), (620, 1.5), (665, 6.5), (720, 3), (900, 1)]
# the lean weakens as the phone closes in: (time [s], share [0-1])
PLACE = [(0, 1), (3, 1), (4.5, 1), (5.7, 0.3)]
PORT_LAG = 5  # samples


def ports(bird):
    """The near dove at two microphone ports: it reaches the left first, and each pitch leans to a side."""
    leaning = np.array([colour(bird, [(hz, side * db / 2) for hz, db in STANDING_WAVE])
                        for side in (1, -1)])
    left, right = bird + curves(PLACE, TIME)[0] * (leaning - bird)
    return np.array([left, np.pad(right, (PORT_LAG, 0))[:N]])


def scene():
    """Yard, whistles, soft tones and cage lie around the near dove, whose sideways lean eases later on."""
    near, soft = dove(), soft_tones()
    near_echo = undb(-15.5) * walls(near, t60=0.33, width=1.3)
    soft_echo = undb(-6.5) * walls(soft, t60=0.34, width=1.5)
    voices = ports(near + cage_ring(near)) + near_echo + pan(soft, -.5) + soft_echo
    contacts = ticks() + seeds()
    cage = undb(-1.5) * mesh(contacts + rustle() + wire())
    cage = cage + undb(-12.5) * contacts + undb(-9) * walls(contacts, t60=0.15, width=0.74)
    return voices + cage + high_whistles() + yard()


def record(dry):
    """The phone drops the deepest bass and cuts the top."""
    thinned = signal.sosfilt(signal.butter(4, 40, "high", fs=SR, output="sos"), dry)
    return signal.sosfilt(signal.ellip(8, .2, 70, 15800, fs=SR, output="sos"), thinned)


dry = scene()
out = record(dry)
output_pcm(out)
```